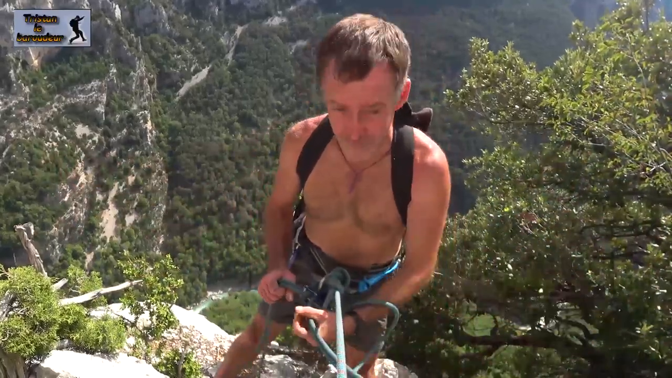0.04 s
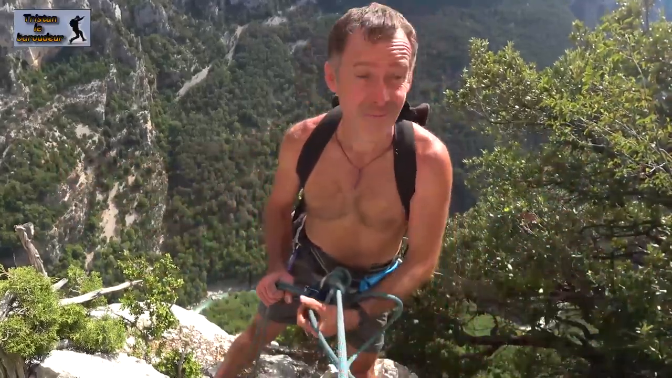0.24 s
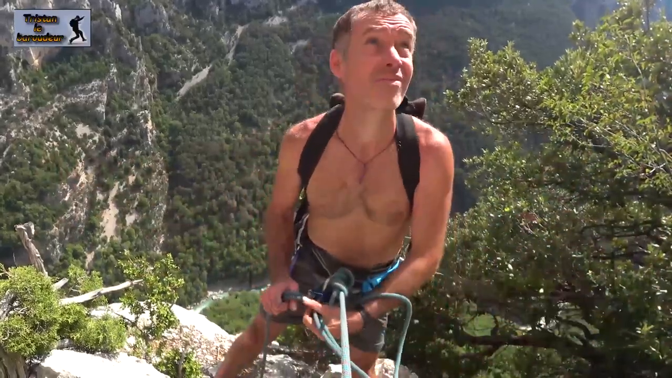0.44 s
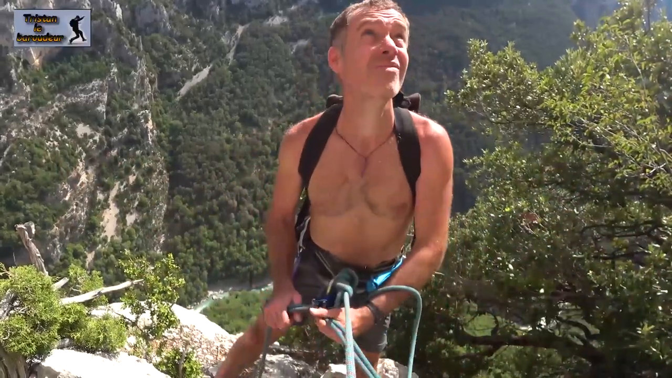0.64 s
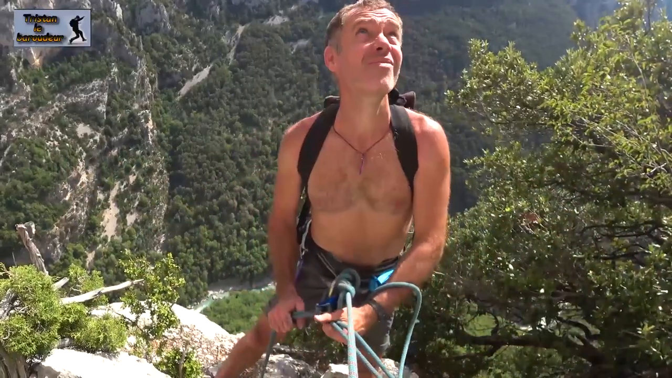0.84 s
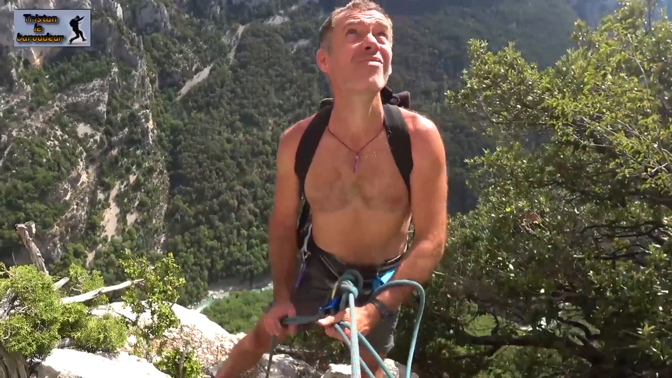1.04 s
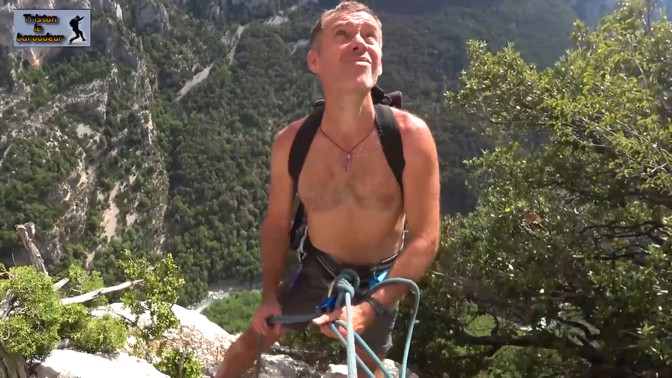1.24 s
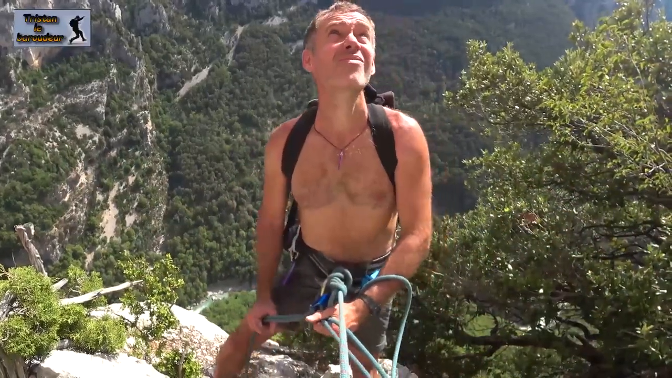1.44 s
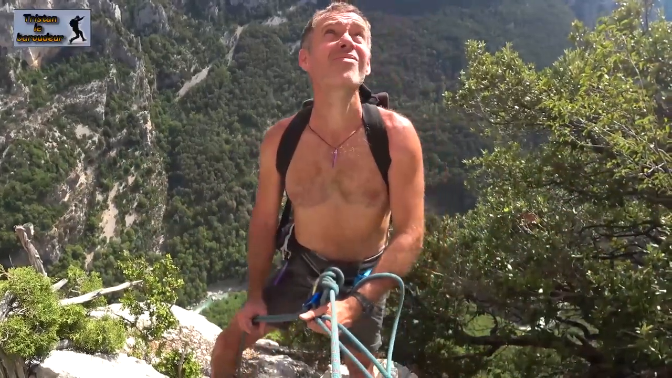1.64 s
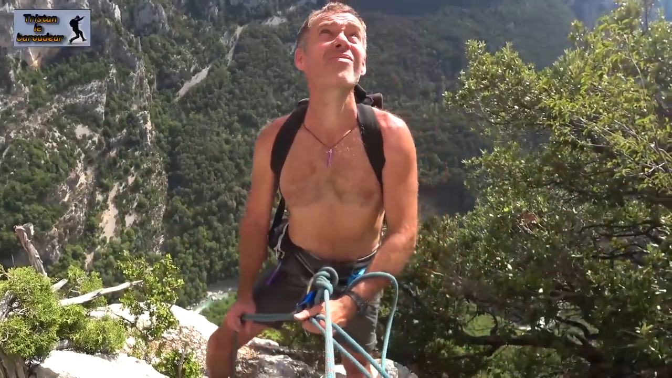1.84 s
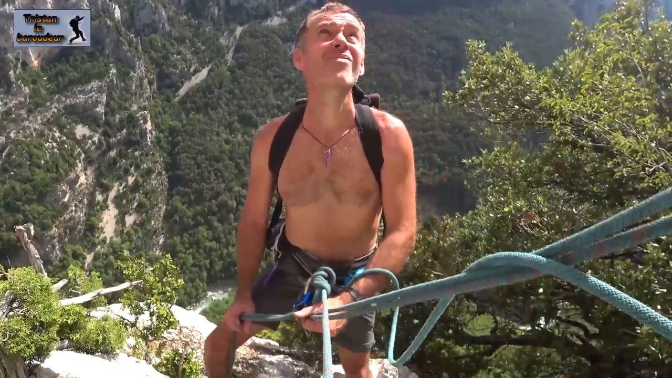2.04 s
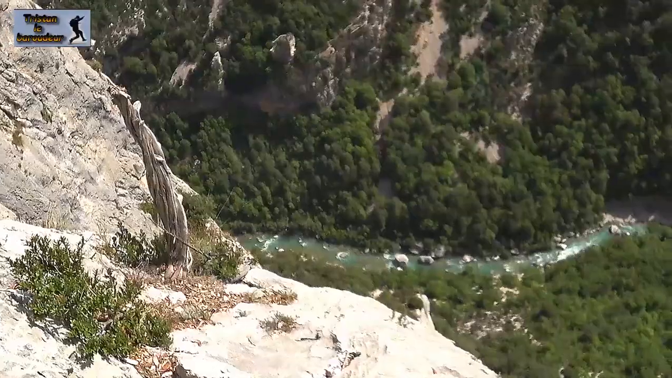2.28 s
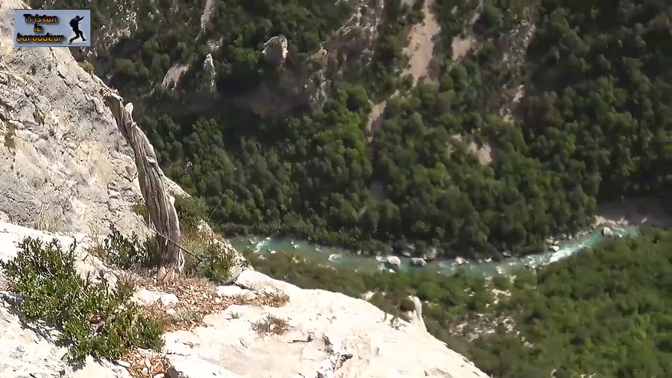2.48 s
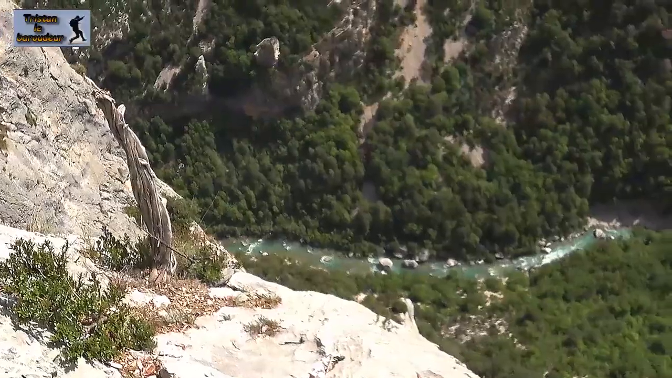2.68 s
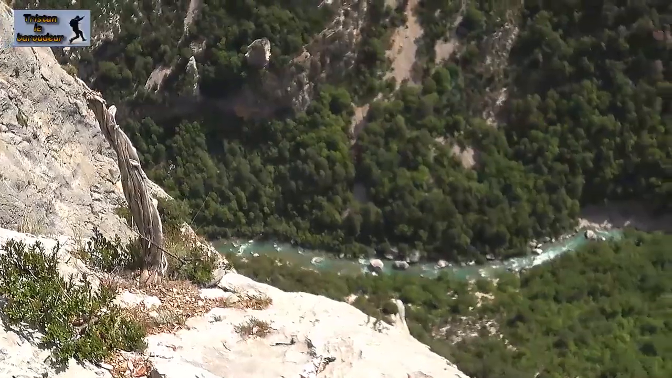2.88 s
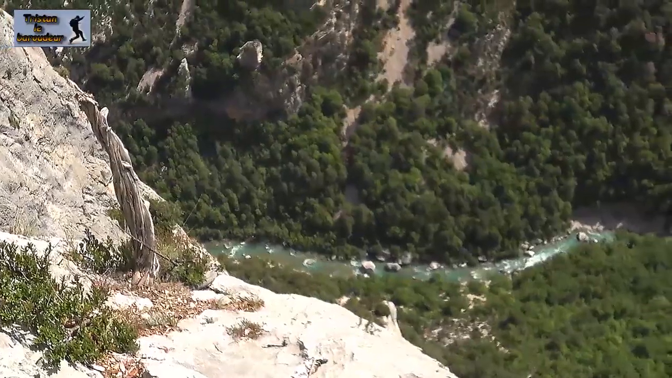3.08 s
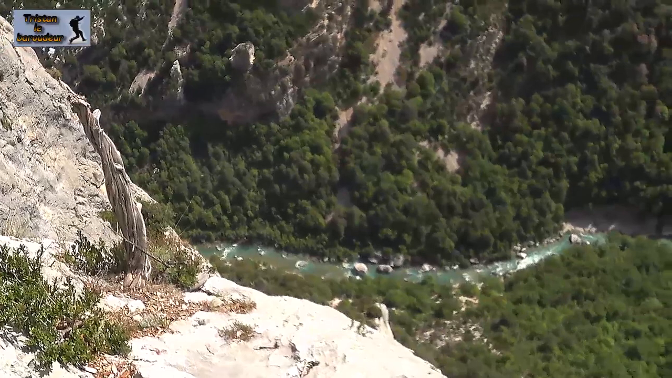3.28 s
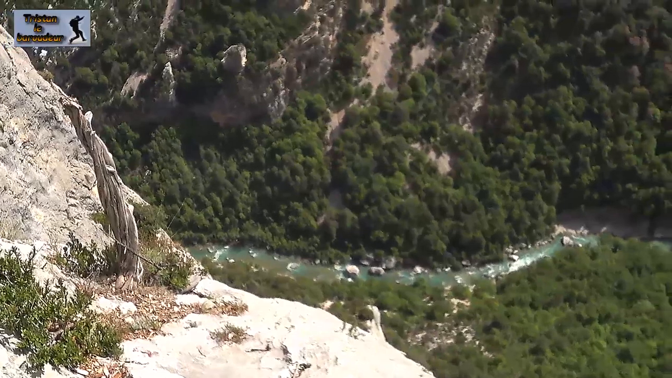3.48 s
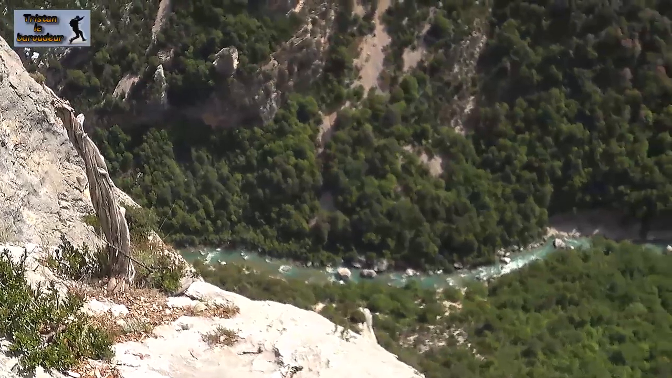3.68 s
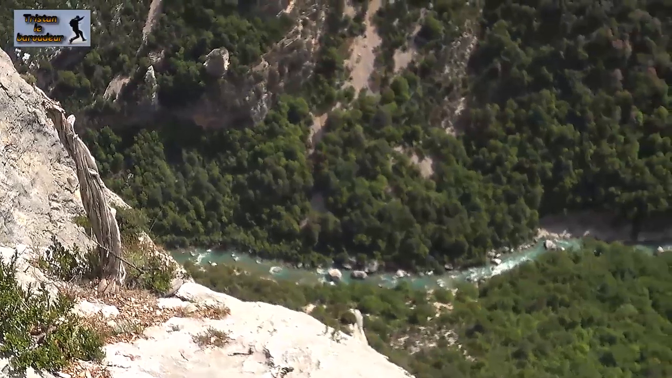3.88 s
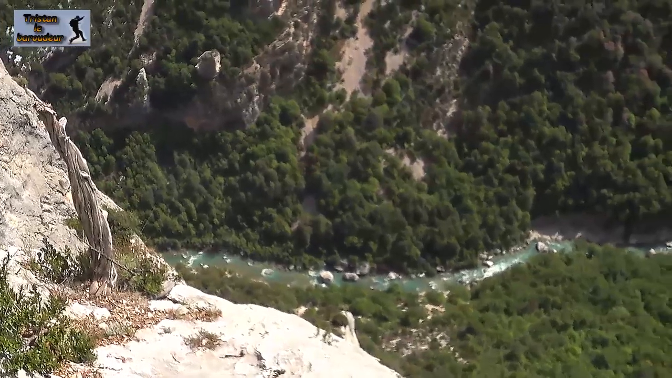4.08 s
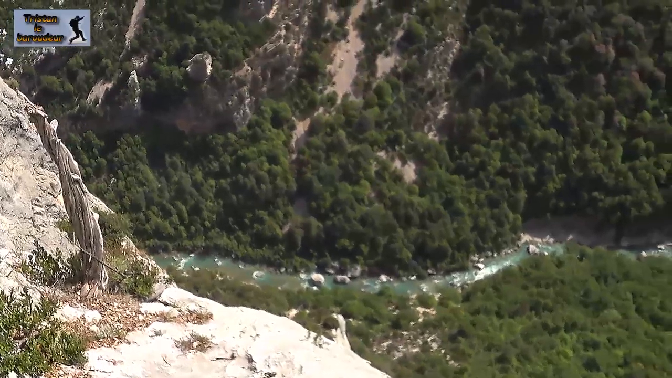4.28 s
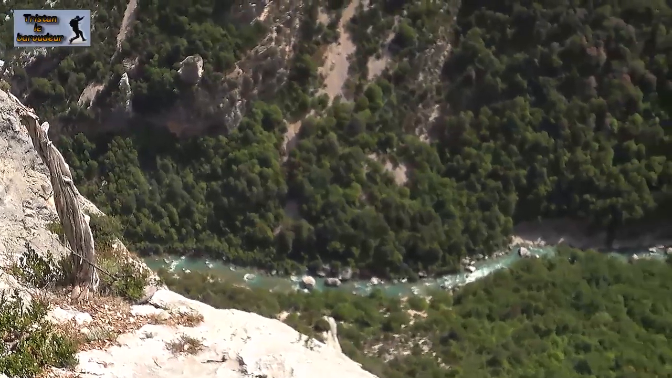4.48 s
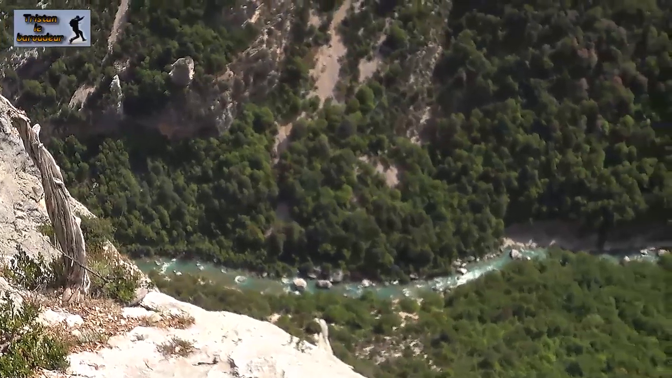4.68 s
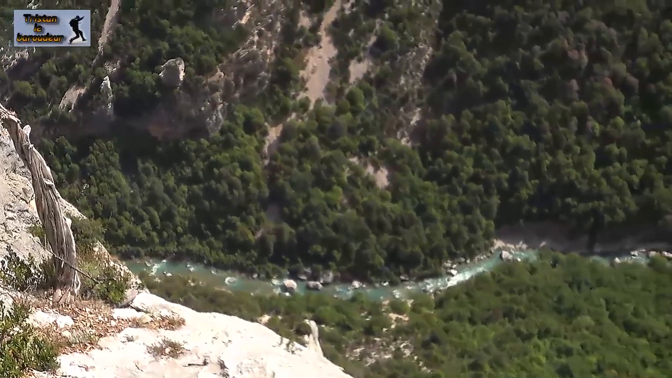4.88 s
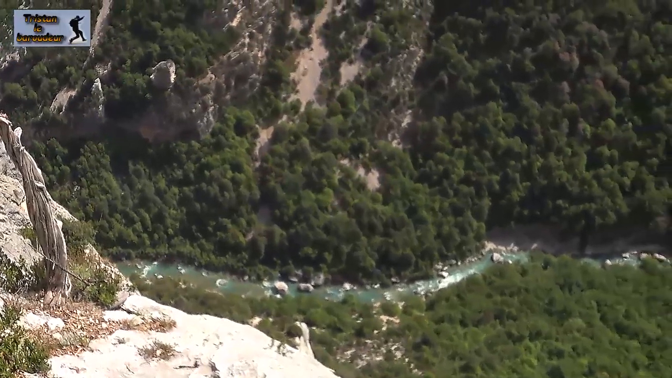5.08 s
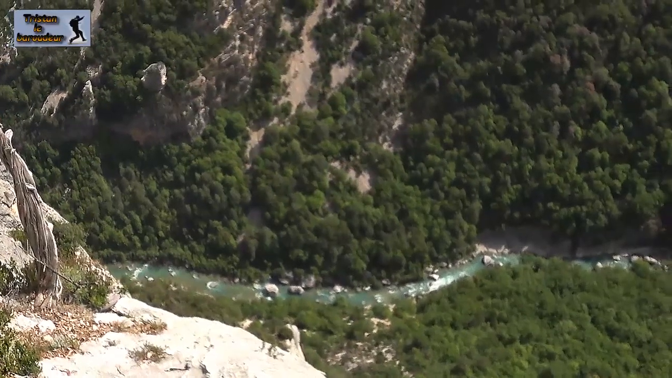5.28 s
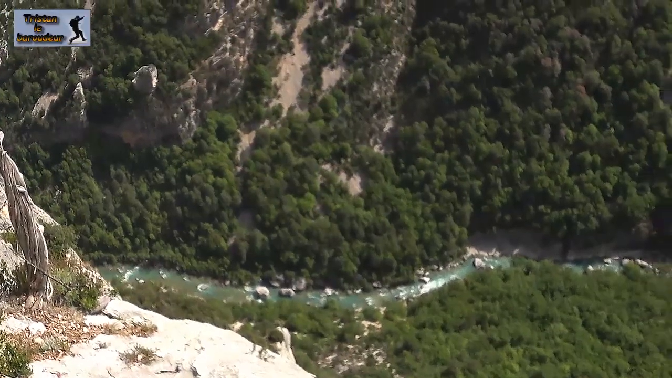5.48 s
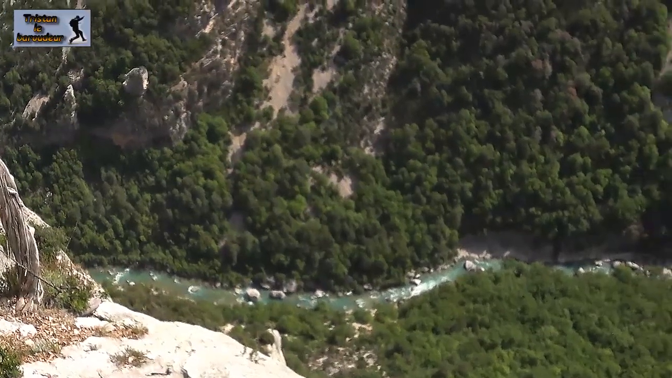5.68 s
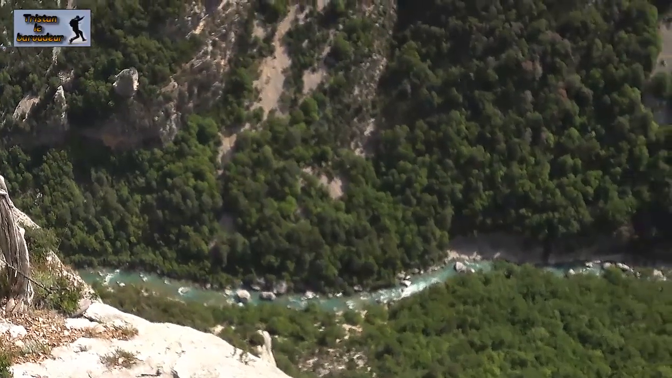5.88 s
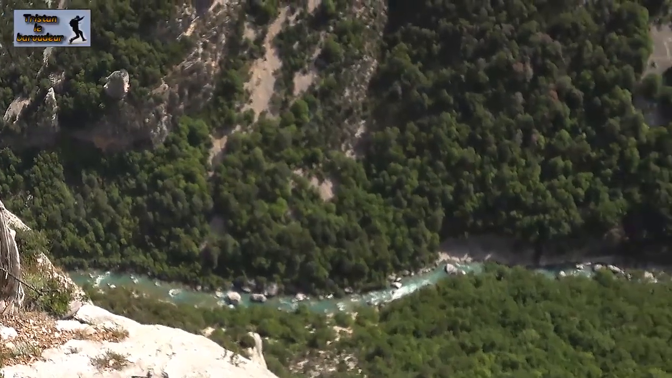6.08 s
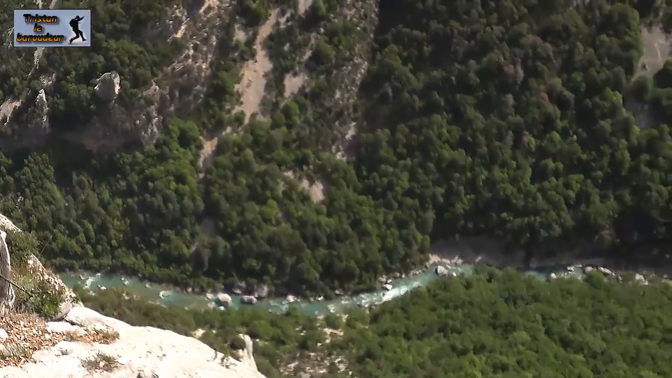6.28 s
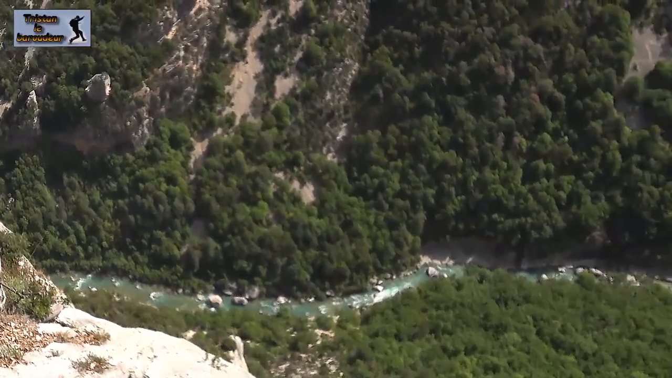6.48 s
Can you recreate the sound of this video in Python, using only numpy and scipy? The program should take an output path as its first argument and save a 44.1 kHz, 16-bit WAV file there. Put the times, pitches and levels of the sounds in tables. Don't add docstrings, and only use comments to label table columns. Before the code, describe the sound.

Close, dry metallic clicks from harness hardware and short rope hisses, densest around two to three seconds, fading to tiny ticks over far-off rapids.

```python
import sys
import numpy as np
from scipy import signal
from scipy.fft import rfft, irfft, next_fast_len
from scipy.io import wavfile
from scipy.ndimage import uniform_filter1d

SR = 44100
rng = np.random.default_rng(int(sys.argv[2]) if len(sys.argv) > 2 else 0)


def undo_db(level):
    steps = np.asarray(level, float) / 20
    return 10 ** steps


def dump(signal):
    limited = np.clip(np.atleast_2d(signal).T, -1, 1)
    pcm = np.round(limited * 32767).astype(np.int16)
    wavfile.write(sys.argv[1], SR, pcm)


N = 287884

# start in seconds, crack level in dB, its low part in dB,
# its high part in dB, ring in dB against the crack.
GATE_HITS = [(.0283, -38, -4, -18, -7), (.042, -39, -11.5, -14, -2), (.3891, -15.5, -28, 1, -4.5),
             (.3992, -7, -8.5, -27, 1), (.4012, -7.5, -8, -13, -13), (.4396, -18, -4, -12, -19),
             (.4484, -27, -15, -14, -8), (.6594, -40.5, -22, -18, -1), (.68, -43, -26, -12, 1.5),
             (.694, -41.5, 0, -14, -1), (1.5264, -46, 0, -18, -7), (1.6501, -37, -2, -34, -1)]
NOSE_HITS = [
    (.064, -40, -12, -12, 0),
    (.078, -40, -17, -18, -4),
    (.1984, -40, -12, -22, 1),
    (.614, -11.5, -27, -9, -4),
]
PLATE_HITS = [
    (2.1613, -21.5, 0, -18, 6.5),
]
LOOP_HITS = [(2.4925, -36.5, -5, -18, 0), (2.555, -53, -5, -18, 8), (3.057, -54, -2, -18, 9),
             (3.065, -48.5, -2, -18, 8), (3.259, -47, -8, -18, 9), (3.268, -50, -8, -18, 10),
             (3.3328, -45, 4, -18, 5), (3.5263, -50, -1, -16, 6), (5.0235, -46.5, 5, -12, 4),
             (5.99, -54, -3, -15, 9), (6.03, -53, -2, -15, 5), (6.1065, -54, 0, -17, 6),
             (6.157, -49, -1, -18, 10), (6.169, -51, -1, -18, 10), (6.197, -55, -1, -18, 8),
             (6.238, -52, -4, -18, 7), (6.367, -55, -4, -18, 7), (6.3944, -48, -4, -14, 9)]
CLIP_HITS = [(2.5511, -47, 0, -15, -4), (2.6578, -24, -5, -8, -13), (2.7455, -60, 11, -10, 10),
             (3.057, -46, -14, 0, -4), (3.0645, -34, -14, -14, -3), (3.259, -32, -19, -4, -6),
             (3.268, -44, -15, -10, 0), (3.2979, -32.5, -20, -9, -12), (3.93, -36.5, 2.5, -24, -8),
             (4.4425, -37, -14, -12, 1), (4.45, -43, -14, -10, 0), (4.5735, -46, 0, -24, -3),
             (6.1574, -39, -4, 3, -11)]
SLEEVE_HITS = [(2.3111, -38.5, -8, -20, 6), (2.3774, -27, -8, -10, 2.5), (2.385, -36, -16, -8, 8),
               (2.5064, -43, -10, -5, -1), (2.9163, -36, -3, -34, 3), (3.8237, -46, -10, -24, -2),
               (3.8382, -43, -12, -22, 0), (6.5175, -46.5, 6, -14, 7)]
BUCKLE_HITS = [
    (.5, -43.5, 6, -14, 11),
    (.5796, -44, 12.5, -14, 1),
    (2.0347, -32, 5.5, -12, -14),
    (2.3668, -13.5, -14.5, -4, -27),
]
DEVICE_HITS = [
    (2.0135, -37, 5, -8, -14),
    (2.446, -18, -6, -12, -2),
    (2.4624, -28, -9, 5, -15),
]
BUNCH_HITS = [
    (3.8586, -11, -7.5, -1, -4),
    (3.8644, -20, -15, -1, -1),
    (3.8714, -27, -10, 8, -12),
    (3.8804, -25, -6, 1, -18),
]
COLLAR_HITS = [
    (2.384, -38, -14, -8, 9),
    (2.51, -56, -14, -8, 6),
    (6.5185, -58, -14, -8, 4),
]
SHACKLE_HITS = [
    (2.401, -12, -5.5, -10, -14),
    (2.4045, -25, -16, -6, 7),
    (2.408, -25, -16, 0, 4),
    (2.4145, -31, -16, 0, 1),
]
EYE_HITS = [(.255, -52, -10, -15, 8), (2.431, -50, -7, -13, 8), (2.6578, -38.5, -10, -15, 12),
            (3.0645, -50, -10, -15, 9.8), (3.259, -49.5, -10, -15, 11), (3.931, -52, -10, -15, 7),
            (4.443, -49, -10, -15, 12.4), (4.471, -56, -10, -15, 12), (4.574, -50, -10, -15, 10),
            (4.58, -52, -10, -15, 11)]
SWIVEL_HITS = [
    (.2545, -47, 4, -15, 6.7),
    (4.385, -49, 6, -15, 4),
    (4.443, -41, 4, -20, 8.3),
    (4.574, -43, 4, -15, 7),
]
# frequency in Hz, level in dB, t60 in seconds.
GATE = [(2540, -18, .022), (3440, -5, .022), (3660, -12, .03), (4566, -3, .022), (5090, 3.5, .032),
        (5660, -9, .03), (6318, -4.5, .042), (7196, -11, .03), (7696, -11, .03), (8345, -9, .03),
        (8720, -12, .04), (9205, -13, .03), (10010, -16, .035), (11038, -9, .05), (12200, -12, .025)]
NOSE = [(3591, -20, .06), (5100, -5, .015), (5432, -5, .022), (6508, -13, .035), (7235, -12, .035),
        (7741, -10, .035), (9184, -12, .055), (9582, -5, .03), (11240, -3, .032), (12150, -12, .03),
        (13700, -16, .03)]
PLATE = [(1896, -13, 0.037), (3597, 5.5, 0.034), (3730, -18, .07), (7700, -22, .02)]
LOOP = [(3570, -8, .05), (3610, -0.5, 0.11), (3750, -4, .03)]
CLIP = [(7100, -5, .03), (7360, -1, .05), (8070, -7, .025), (9900, -11, .03), (11720, -6, .055),
        (11950, -11, .025)]
SLEEVE = [(5030, -6, .03), (8620, -1, .035), (10620, -4, .07)]
BUCKLE = [(3130, 0.5, 0.06), (3430, -17, 0.028), (6850, -6, 0.022), (7800, -18, 0.018)]
DEVICE = [(2245, -7, .022), (3800, -12, .025), (4328, 0, .022), (5120, -8, .015), (5910, -14, .025),
          (9100, -14, .03), (11170, -8, .012), (12040, -8, .03)]
BUNCH = [(4700, -6, .03), (5000, 0, .035), (5350, -2, .03), (5700, -4, .025), (7950, -2, .015),
         (8400, -5, .015), (12000, -10, .03), (15300, -6, .02)]
COLLAR = [(11500, -2, .035), (13600, -14, .025), (15550, 0, .04)]
SHACKLE = [(7413, -8, .015), (8118, 0, .03), (8888, -11, .035), (9227, -14, .04), (11760, -4, .045),
           (12100, -10, .025), (15570, -14, .02)]
EYE = [(5200, 0, .02), (5280, -3, .07)]
SWIVEL = [(3620, -7, .07), (3800, 2, .03), (3980, -5, .02)]


def gear():
    pieces = dict(
        gate=(GATE_HITS, GATE), nose=(NOSE_HITS, NOSE), plate=(PLATE_HITS, PLATE), loop=(LOOP_HITS, LOOP),
        clip=(CLIP_HITS, CLIP), sleeve=(SLEEVE_HITS, SLEEVE), buckle=(BUCKLE_HITS, BUCKLE),
        device=(DEVICE_HITS, DEVICE), bunch=(BUNCH_HITS, BUNCH), collar=(COLLAR_HITS, COLLAR),
        shackle=(SHACKLE_HITS, SHACKLE), eye=(EYE_HITS, EYE), swivel=(SWIVEL_HITS, SWIVEL))
    out = np.zeros(N)
    for piece, (hits, modes) in pieces.items():
        usual_low_db, usual_high_db = np.median(hits, 0)[2:4]
        for s, db, low_db, high_db, ring_db in hits:
            t60_ms = rattle_ms(piece, db)
            flutter = np.clip(.025 * (-28 - db), 0, .5)
            low_tilt_db = 0.44 * (low_db - usual_low_db)
            high_tilt_db = 0.44 * (high_db - usual_high_db)
            contact = crack(low_db + 3.5, high_db - 4.5, t60_ms)
            tone = ring(modes, low_tilt_db, high_tilt_db, .3 * t60_ms, flutter)
            add(out, s, undo_db(db - 5.5) * contact)
            add(out, s, undo_db(db - 5.0 + ring_db) * tone)
    return out


# start in seconds, crack level in dB, low part in dB, high part in dB.
MUTED_TICKS = [(2.091, -15.5, -10.5, -28), (2.2172, -24, -9, -21), (2.2738, -44, 2, -10),
               (2.02, -44, -14, 4), (2.224, -39, -10, -10), (2.372, -34, -8, -16), (2.4893, -36, -8, -14),
               (2.4277, -39, 4, -14), (2.5153, -46, 10, -12), (2.6005, -47, -1, -18),
               (2.8172, -32.5, -4, -20), (2.89, -46, -10, -4), (2.9038, -32, -16, -16),
               (2.9287, -36.5, -2, -11), (3.007, -46, -1.5, -9), (4.1704, -43, -14, -22),
               (4.722, -56, -2, -18), (4.8514, -51.5, 8, -2), (4.9093, -40.5, -7, -14),
               (5.1605, -45.5, 1, -18), (5.177, -45.5, 13, -18), (3.9085, -45, 0, -10),
               (5.2748, -40.5, -4, -7), (5.3814, -49, 1, -14), (6.4702, -52, 3, -16)]


def muted_ticks():
    out = np.zeros(N)
    for s, db, low_db, high_db in MUTED_TICKS:
        add(out, s, undo_db(db - 2.0) * crack(low_db + 3.0, high_db + 8.0, rattle_ms("muted", db)))
    return out


# start in seconds, level in dB.
SPINE_KNOCKS = [
    (0.44, -22.5),
    (6.5185, -37),
]
# frequency in Hz, level in dB, t60 in seconds.
SPINE = [(1300, -10, 0.027), (2070, -12.5, 0.071), (2380, -12, .03), (2570, 0, 0.033)]


def knocks():
    out = np.zeros(N)
    for s, db in SPINE_KNOCKS:
        add(out, s, undo_db(db) * ring(SPINE, 0, 0, 4))
    return out


# start in seconds, frequency in Hz, level in dB, t60 in seconds.
GRAZES = [(.028, 4450, -38, .035), (.029, 5100, -36, .04), (.03, 3770, -41, .04), (.03, 8800, -43, .04),
          (.044, 9000, -44, .09), (.05, 4500, -43, .04), (.058, 7500, -41, .06), (.062, 11200, -45, .08),
          (.071, 4500, -42, .06), (.08, 5650, -45, .05), (.29, 7000, -47, .02), (.4484, 6500, -32, .02),
          (2.3255, 10620, -45, 0.1), (2.3778, 13600, -39, .04), (2.384, 10620, -37, .06),
          (2.04, 7900, -40, .03), (.455, 7800, -45, .05), (.46, 13380, -48, .08), (2.662, 11750, -39, .06),
          (2.745, 5250, -48, .03), (2.904, 6900, -40, .02), (3.813, 8600, -48, .03),
          (3.844, 11600, -47, .06), (3.866, 11900, -33, .06), (3.874, 12100, -34, .05),
          (3.888, 15600, -43, .05), (3.931, 11700, -47, .07), (3.942, 5250, -47, .12),
          (5.088, 3620, -49, .06), (6.008, 3610, -50, .06)]


def grazes():
    out = np.zeros(N)
    for s, hz, db, t60 in GRAZES:
        add(out, s, ring([(hz, db, t60)], 0, 0, 4.3, .3))
    return out


# t60 in ms of the firmest blow, added ms per dB softer, longest t60 in ms.
RATTLE = dict(gate=(13.5, .5, 21), nose=(18, .33, 25), plate=(9, .18, 12), loop=(12, .12, 15),
          clip=(8.9, 1.2, 35), sleeve=(12, 0.14, 21), buckle=(9, .45, 23), device=(13, .65, 21),
          bunch=(13, 3.2, 65), muted=(4.6, .7, 23), collar=(8.6, .1, 12), shackle=(10, .6, 22),
          eye=(8, .1, 11), swivel=(10, .2, 18))


def rattle_ms(piece, db):
    firm_ms, ms_per_db, longest_ms = RATTLE[piece]
    firmest_db = -9.5
    return np.clip(firm_ms + ms_per_db * (firmest_db - db), 4, longest_ms)


CRACK_EDGES_HZ = [1250, 4200, 9000, 14500]


def crack(low_db, high_db, t60_ms):
    t = np.arange(4000) / SR
    fall_db = -60e3 * t / max(t60_ms, 2)
    rattle_and_tail = undo_db(fall_db) + undo_db(-25 + 0.16 * fall_db)
    onset = np.minimum(t / 0.00052, 1)
    burst = rng.standard_normal(len(t)) * rattle_and_tail * onset
    burst[24] += 3.5
    out = np.zeros(len(t))
    bands = zip(CRACK_EDGES_HZ, CRACK_EDGES_HZ[1:], (-1, 1, -1), (low_db, 0, high_db))
    for lo, hi, sign, db in bands:
        band = signal.lfilter(*signal.butter(2, [lo, hi], "band", fs=SR), burst)
        out += sign * undo_db(db) * band / abs(band).max()
    return out


def ring(modes, low_db, high_db, chatter_ms, flutter=0):
    hz, db, t60 = np.transpose(modes)[:, :, None]
    place, phase, swing = rng.standard_normal((len(modes), 3)).T[:, :, None]
    t = np.arange(3500) / SR
    db = db + 1.2 * place
    db = db + np.interp(hz, [2950, 4460, 8000, 11000], [low_db, 0, 0, high_db])
    swing_hz = np.interp(swing, [-2, 2], [35, 90])
    beats = 1 - flutter * np.sin(np.pi * swing_hz * t) ** 2
    dying = beats * undo_db(db - 60 * t / t60)
    tones = (dying * np.sin(2 * np.pi * hz * t + phase)).sum(0)
    tones *= np.minimum(t / 0.00067, 1)
    out = tones.copy()
    when, size = rng.standard_normal((4, 2)).T
    for s, gain in zip(abs(when) * chatter_ms / 1000, size):
        add(out, s, (.05 + .2 * flutter) * gain * tones)
    return out


def rock(x):
    t = np.arange(3500) / SR
    sparse = rng.random(len(t)) < .06
    taps = rng.standard_normal(len(t)) * sparse * undo_db(-60 * t / 0.065) * (t > .001)
    return signal.oaconvolve(x, taps / np.linalg.norm(taps))[:N]


# start, fastest moment and end in seconds,
# level in dB, brightness in dB.
PULLS = [(-.03, 0.057, 0.23, -50.5, -2), (0.357, .5, 0.76, -54.5, 1.5), (.8, 1.099, 1.6, -52, -3.5),
         (1.902, 1.993, 2.06, -51.5, 0), (2.011, 2.019, 2.07, -49, 3), (2.029, 2.04, 2.064, -47, 3),
         (2.06, 2.12, 2.17, -45.5, 7.5), (2.13, 2.18, 2.192, -48, 5.5), (2.198, 2.23, 2.28, -55, 0),
         (2.366, 2.372, 2.4, -53, 2), (2.4, 2.408, 2.44, -49, 6), (2.445, 2.452, 2.49, -53, 8),
         (2.57, 2.66, 2.98, -61, -3), (2.837, 2.95, 3.06, -53.5, -3), (3.24, 3.29, 3.43, -55, -12),
         (3.46, 3.62, 3.7, -61, -7), (3.86, 3.9, 3.8, -62, 0), (6.02, 6.18, 6.5, -66, -5)]
# time in seconds, level in dB.
SLACK = [(0, -56), (.8, -62), (1.8, -62), (2.3, -63), (3.1, -63.5), (4.1, -65), (5.1, -68.5), (5.6, -76),
         (6.53, -71)]
# frequency in Hz, level in dB.
ROPE_COLOUR = [(1500, -19), (3000, -3.5), (5600, 0), (6500, -4.5), (7500, 0.5), (8800, -5), (10500, -2),
               (11800, -3), (13200, -5.5), (16000, -11.5)]


def rope():
    sizes = undo_db(3.0 * np.minimum(rng.exponential(1, N), 3))
    slipping = rng.random(N) < 3000 / SR
    slips = sizes * slipping * rng.standard_normal(N)
    fibres = evened(patchy_noise(1.4, size=512))
    rub = coloured(.6 * evened(slips) + fibres, ROPE_COLOUR)
    top = signal.sosfilt(signal.butter(1, [9000, 14000], "band", fs=SR, output="sos"), rub)
    level = undo_db(curve(SLACK))
    bright = level * undo_db(-4)
    fullness = .7
    for start, fastest, end, db, bright_db in PULLS:
        speed = curve([(start, 0), (fastest, 1), (end, 0)])
        pull = undo_db(db) * speed ** fullness
        level = np.hypot(level, pull)
        bright = np.hypot(bright, pull * undo_db(bright_db))
    return undo_db(1.8) * (level * rub + (bright - level) * top)


# frequency in Hz, level in dB per Hz.
LEDGE_RIVER = [(18, -62), (30, -44), (161, -15.5), (355, -2.5), (449, -4.5), (721, -1.5), (1100, -4),
               (2230, -10), (2410, -10.5), (2680, -12), (4420, -24.5), (11700, -30.5), (16000, -36)]
# frequency in Hz, level in dB per Hz.
LATER_RIVER = [(18, -72), (30, -43), (131, -23.5), (174, -15), (415, -4.5), (526, -3), (616, -1),
               (1220, -3), (2010, -8), (2480, -7), (3140, -15.5), (5590, -26.5), (14800, -39.5),
               (16000, -30)]
# time in seconds, level in dB.
RIVER_LEVEL = [(0.0, -44), (0.74, -45), (1.14, -46), (1.96, -45.5), (2.49, -47.5), (3.34, -48.5),
               (3.49, -48), (4.74, -47), (5.51, -48), (6.53, -47)]


def river():
    water = patchy_noise(0.92, size=1024)
    on_ledge = before_cut()
    heard = on_ledge * coloured(water, LEDGE_RIVER) + (1 - on_ledge) * coloured(water, LATER_RIVER)
    return undo_db(curve(RIVER_LEVEL) + 1.5) * heard


# peak time in seconds, level in dB, seconds to fall 20 dB.
GUSTS = [
    (.13, -52, .15),
    (.3, -35, 0.12),
    (.37, -39, .11),
    (.75, -60.5, .2),
    (.92, -49, 0.14),
    (1.23, -62, .12),
    (1.35, -60.5, 0.2),
    (1.5, -64, .15),
    (2.04, -48.5, 0.08),
    (2.17, -47, 0.08),
]
# frequency in Hz, level in dB per Hz.
WIND_COLOUR = [(12, -63), (20, -27), (118, 2.5), (189, -1.5), (225, 7.5), (325, -10), (499, -15),
               (600, -27), (780, -47), (1320, -120)]


def wind():
    lumps = undo_db(1.8 * evened(uniform_filter1d(rng.standard_normal(N), size=1200)))
    t = np.arange(N) / SR
    power = undo_db(-71) ** 2
    for s, db, fall_s in GUSTS:
        power = power + undo_db(db - 20 * abs(t - s) / fall_s) ** 2
    pressure = coloured(lumps * rng.standard_normal(N), WIND_COLOUR)
    return undo_db(-2.5) * np.sqrt(power) * before_cut() * pressure


def before_cut():
    cut_s, fade_s = 2.215, .02
    return np.clip((cut_s - np.arange(N) / SR) / fade_s, 0, 1)


# frequency in Hz, level in dB per Hz.
HISS_COLOUR = [(3000, -30), (7000, -8), (10000, -1), (13000, 1), (16000, -2.5)]


def hiss():
    return undo_db(-70.8 + 2.5) * coloured(rng.standard_normal(N), HISS_COLOUR)


def evened(x):
    return x / np.sqrt(np.mean(x ** 2) + 1e-20)


def curve(rows):
    s, value = np.transpose(rows)
    return np.interp(np.arange(N) / SR, s, value)


def add(mix, s, sound):
    part = mix[round(s * SR):][:len(sound)]
    part += sound[:len(part)]


def coloured(x, points):
    hz, db = np.transpose(points)
    size = next_fast_len(len(x))
    bins_hz = np.fft.rfftfreq(size, 1 / SR)
    gain = undo_db(np.interp(np.log(bins_hz + 1), np.log(hz + 1), db))
    return evened(irfft(rfft(x, size) * gain, size)[:len(x)])


def patchy_noise(patch_db, size):
    a, b, patches = rng.standard_normal((N * 4 // size + 8, size // 2 + 1, 3)).T
    patches = uniform_filter1d(patches, size=10, axis=0)
    patches = evened(uniform_filter1d(patches, size=12, axis=1))
    spectrum = (a + 1j * b) * undo_db(patch_db * patches)
    return signal.istft(spectrum, nperseg=size, noverlap=size * 3 // 4)[1][:N]


def low_pass(x, hz):
    return signal.oaconvolve(x, signal.firwin(511, hz, window=("kaiser", 9), fs=SR)[None], "same")


def scene():
    metal = gear() + muted_ticks()
    bounce = undo_db(-15) * rock(metal)
    touches = knocks() + grazes()
    return (metal + bounce + touches + rope() + river() + wind() + hiss())[None]


def band_limit(x):
    return signal.sosfilt(signal.butter(12, 17020, fs=SR, output="sos"), x)


def record(dry):
    limited = low_pass(dry, 15750)
    treble = np.diff(dry, prepend=0) ** 2
    sharp = uniform_filter1d(treble, size=64) > 9 * uniform_filter1d(treble, size=2048)
    passed = np.minimum(64 * uniform_filter1d(1. * sharp, size=256), 1)
    extra_treble = low_pass(dry, 16700) - limited
    return band_limit(limited + undo_db(-10) * passed * extra_treble)


dry = scene()
out = record(dry)
dump(out)
```